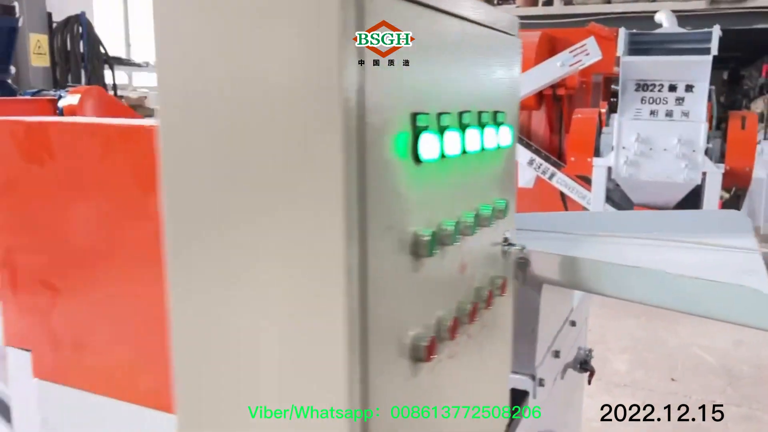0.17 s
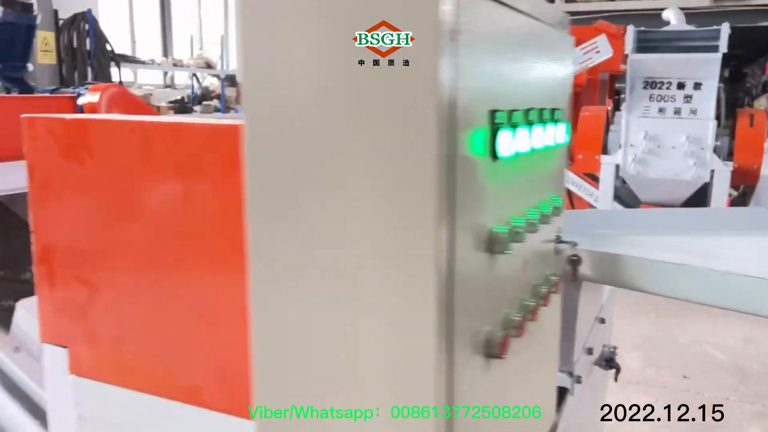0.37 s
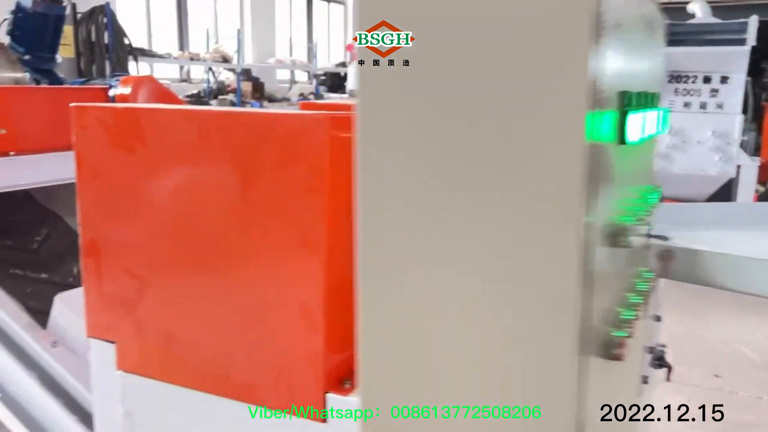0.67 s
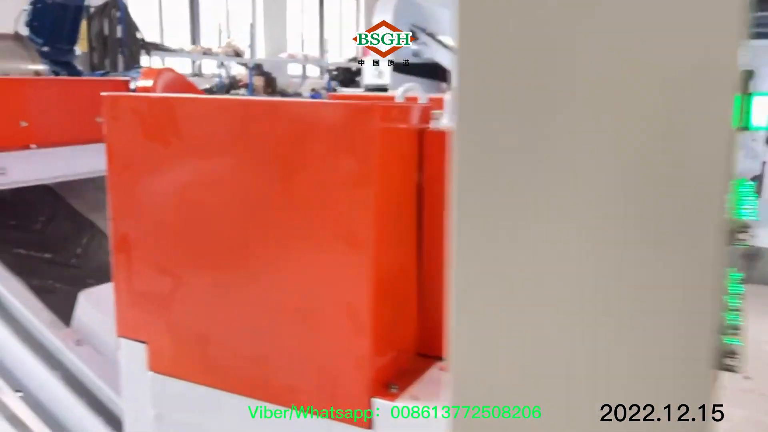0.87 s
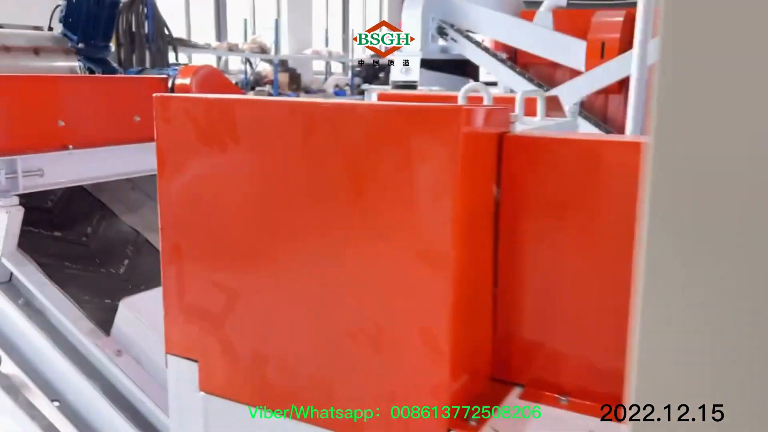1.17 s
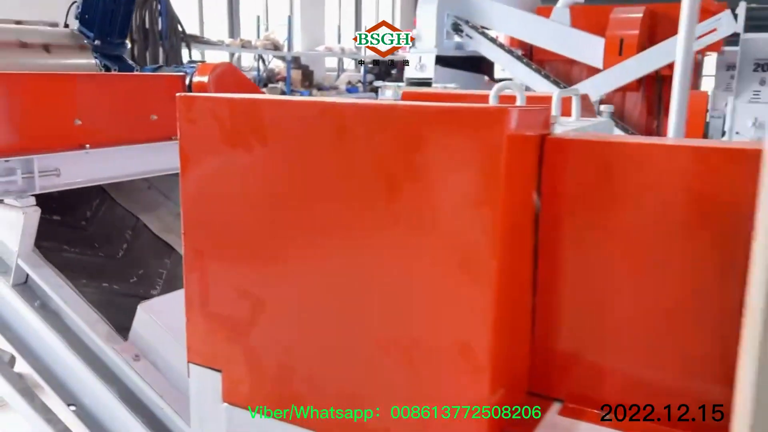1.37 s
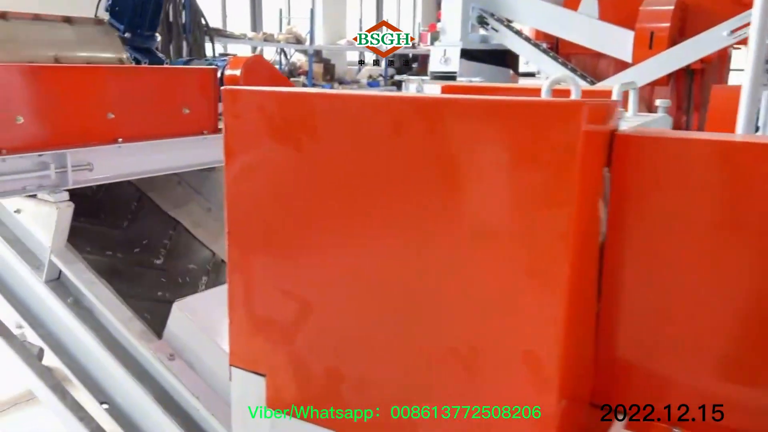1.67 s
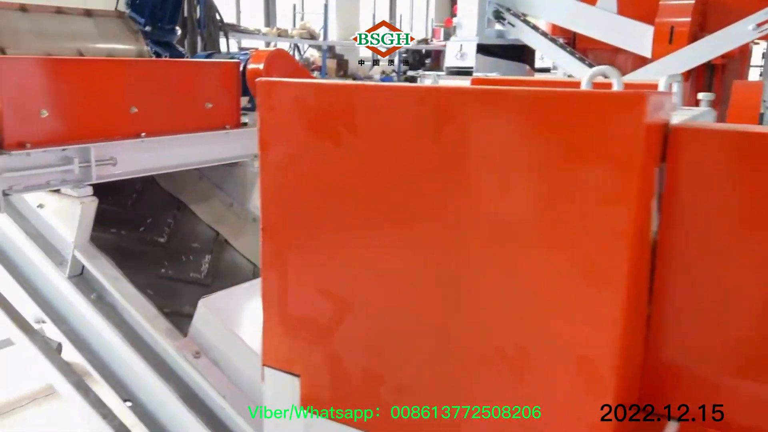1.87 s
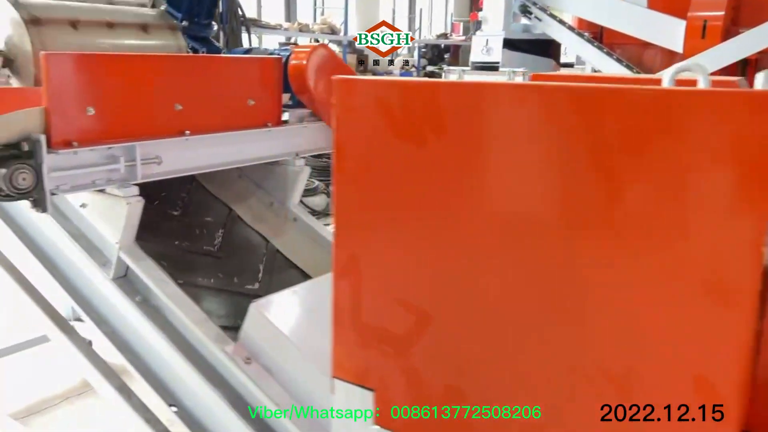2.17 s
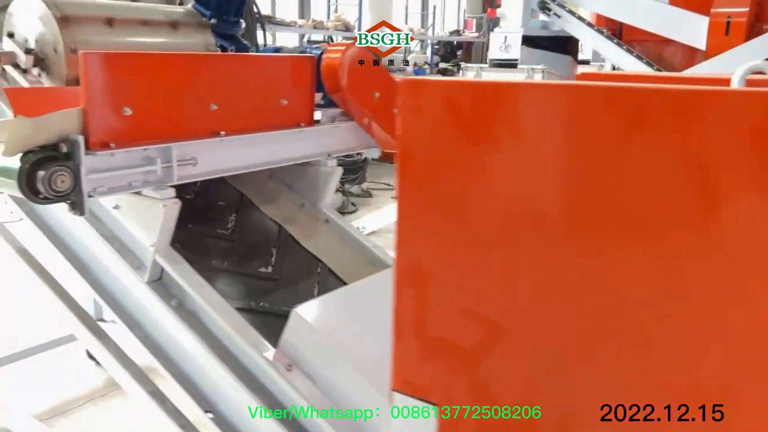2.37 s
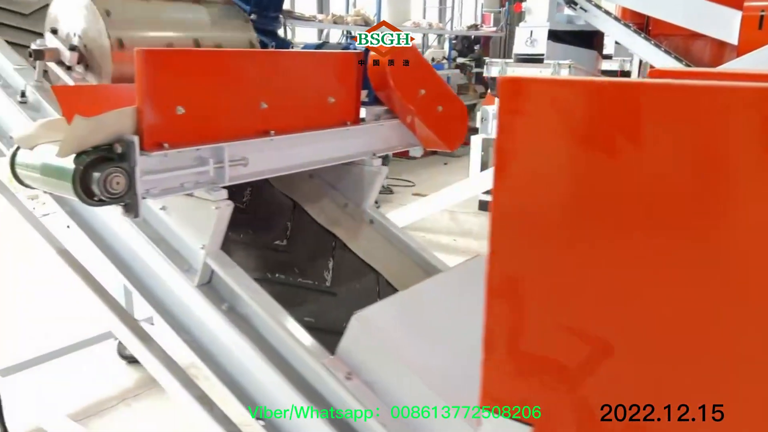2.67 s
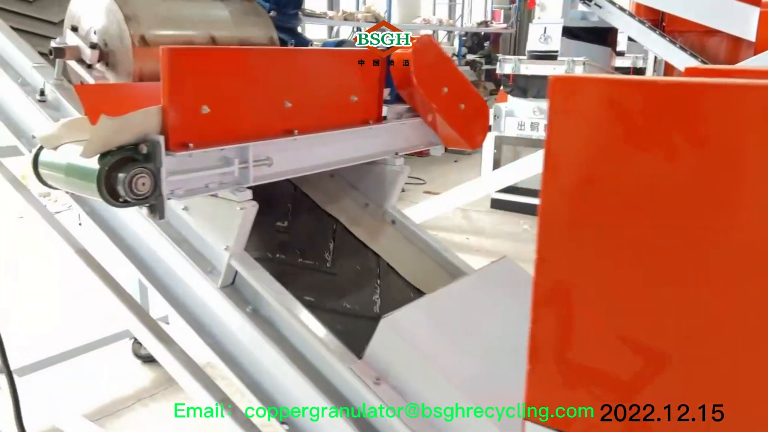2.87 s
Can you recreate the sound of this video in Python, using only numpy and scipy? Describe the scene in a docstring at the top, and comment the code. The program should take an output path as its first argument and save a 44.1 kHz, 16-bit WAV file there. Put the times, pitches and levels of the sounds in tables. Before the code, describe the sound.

Loud cable-chopping machinery drones in a workshop while chips hiss and rattle against steel.

```python
"""A granulator chops cable in a large workshop: its knives ring the steel housing, its rotor
shakes the frame and its panels whine. Chips hiss, a shaking table throws fine copper granules
and metal scrapes sing out, all over a bed of motor hum and heavy shaft rumble.
We hear it from a phone carried along the recycling line. Behind a steel cabinet the treble
falls away and single bursts of chips rattle out against sheet steel."""
import sys
import numpy as np
from scipy import signal
from scipy.fft import rfft, irfft
from scipy.io import wavfile

SR = 44100
rng = np.random.default_rng(int(sys.argv[2]) if len(sys.argv) > 2 else 0)


def bounce(signal):
    """Save signal as a 16-bit WAV file at the path given by the first command-line argument."""
    frames = np.transpose(np.atleast_2d(signal))
    limited = np.clip(frames, -1, 1)
    pcm = np.round(limited * 32767).astype(np.int16)
    wavfile.write(sys.argv[1], SR, pcm)


N = 132741

ROTOR_HZ, SHAFT_HZ, KNIVES = 10.676, 10.47, 3  # turns a second of rotor and heavy shaft; knife count
DRONE_REPEAT, CHOP_REPEAT = 0.42, 0.53  # share of the power that loops with each turn
SIDES = np.array([[1], [-1]])  # left, right

# Low bed of the workshop (frequency [Hz], density [dB per Hz])
FLOOR_SPECTRUM = [(20, -92), (35, -95), (52, -66), (84, -54.5), (106, -50.5), (130, -66), (200, -89)]
# Rumble of the heavy shaft (frequency [Hz], density [dB per Hz])
SHAFT_SPECTRUM = [(90, -86), (140, -56), (172, -45.5), (205, -45.5), (270, -47.5), (370, -51), (470, -76.5),
                  (900, -100)]
# Body of the granulator's frame (frequency [Hz], density [dB per Hz])
FRAME_SPECTRUM = [(250, -80), (370, -61), (450, -48.5), (560, -54.5), (660, -54.5), (790, -64),
                  (1100, -73.5), (3000, -105)]
# Clang of its steel housing (frequency [Hz], density [dB per Hz])
HOUSING_SPECTRUM = [(500, -86), (780, -68), (1020, -56.5), (1160, -59.5), (1370, -55.5), (1600, -63.5),
                    (1930, -60.5), (2150, -68), (2330, -65), (2550, -66.5), (2850, -70), (6000, -74.5),
                    (15000, -105)]
# Hiss of flying chips (frequency [Hz], density [dB per Hz])
CHIP_SPECTRUM = [(100, -93), (1000, -73.5), (2100, -69), (2700, -69), (3300, -70), (4100, -71.5),
                 (4900, -74.5), (6100, -71), (7000, -73.5), (8400, -73.5), (10500, -103), (15500, -90)]
# Sizzle of copper granules (frequency [Hz], density [dB per Hz])
GRANULE_SPECTRUM = [(4000, -100), (7500, -80), (9000, -72), (10800, -68.5), (12300, -72), (14200, -70.5),
                    (15500, -77)]
# Base colour of a burst of chips (frequency [Hz], density [dB per Hz])
RATTLE_SPECTRUM = [(80, -98), (300, -76), (900, -61), (1600, -62), (2200, -66), (3700, -65), (5200, -67),
                   (8400, -70.5), (11000, -70.5), (15500, -77)]
# Motor and panel hum (pitch [Hz], level at the control cabinet [dB], level at the far end [dB])
HUM_TONES = [(105.3, -48.5, -42.5), (179.6, -42, -29.5), (210, -43.5, -32.5), (235.8, -44, -38.5),
             (260.8, -36, -23.5), (323.8, -39.5, -27), (366, -38, -35.5), (467, -57, -34.5)]
# Panel whines (pitch [x rotor speed], off-beam gain [dB], on-beam gain [dB], time on beam [s])
WHINES = [(50, -40, -31.5, 2.1), (51, -46, -38, 2.0), (55, -39, -38, 1.5), (68, -51, -40.5, 1.7),
          (78, -56, -45, 1.2), (90, -49, -42, .7), (96, -51, -36, 1.4), (99, -50, -42, 1.2),
          (117, -50, -43, 1.2), (126, -50, -39.5, 1.55), (132, -47, -42, 1.0), (153, -60, -47, 1.4),
          (165, -60, -47, .3), (198, -53, -33.5, 1.56), (201, -56, -44, 1.7), (206, -51, -40, 1.6)]
# Resonances of the sheet steel that the chips hit (frequency [Hz], width [Hz], boost [dB])
STEEL_MODES = [(2130, 40, 9), (2205, 28, 13.5), (2552, 40, 8.5), (3235, 40, 8), (3478, 32, 10.5),
               (3768, 25, 6), (3892, 30, 7.5), (4377, 30, 5), (5276, 40, 4), (8530, 130, 6)]
# Bursts of chips (time [s], gain [dB], decay [s], tilt [dB per octave])
RATTLE_CUES = [(1.059, -7.5, 0.03, -6.5), (1.136, -6.5, 0.059, 8.5), (2.01, 1.5, 0.056, 4),
               (2.131, -5.5, 0.094, -3.5), (2.418, 0.5, 0.083, -.5), (2.491, -8.5, 0.021, 7),
               (2.608, 0.5, 0.037, 0), (2.637, -0.5, 0.098, 0), (2.744, -8, 0.033, 3), (2.979, -5, 0.16, 3)]
# Metal rubbing (peak time [s], half-length [s], pitch [Hz], width [Hz], level [dB])
SCRAPE_CUES = [(.35, 0.42, 6060, 500, -38.5), (2.39, 0.024, 8400, 300, -45),
               (2.757, 0.022, 7240, 200, -37.5), (2.757, 0.016, 8200, 300, -35)]
# The walk along the line (time [s], way to the far end [0-1])
WALK_PATH = [(0, 0), (1.0, 0.16), (1.7, 0.4), (2.3, 0.78), (2.65, 0.86), (3.0, 0.77)]
# Fader rides on the walk (time [s], shaft [dB], frame [dB], housing [dB], chips [dB], granules [dB])
FADERS = [(0, -2.5, -2, 1, 2.5, -5), (.5, -1, -1, -0.5, 1, -1.5), (1.05, -2.5, 2, -0.5, 1.5, -3),
          (1.5, -2.5, 1, 1, 1, 0.5), (1.8, -4, 1.5, -0.5, 2.5, -0.5), (2.1, 1.5, 1, -1, 3.5, 0),
          (2.25, 1, 1.5, -4, -9, -11), (2.45, 2.5, 0.5, -6.5, -17, -15), (2.7, -3, 0, -2.5, -8, -13),
          (3.0, -6, 1, -9, -16, -13.5)]
# How alike the two microphones sound (frequency [Hz], likeness [0-1])
MIC_LIKENESS = [(25, .94), (60, .99), (140, .98), (290, .945), (640, .77), (1400, .58), (3200, .35),
                (4600, .5), (5900, .45), (6700, .9), (8400, .92), (9400, .999), (10700, .999), (11600, .96),
                (15000, .96)]
# Phase between the microphones (frequency [Hz], left lead [rad])
MIC_PHASE = [(20, 0), (600, 0), (950, .5), (1800, -.4), (2800, .6), (4800, .3), (5900, -.7), (6700, 0),
             (7900, -.3), (8550, -1.1), (9000, -2.3), (9350, -3.1), (10750, -3.2), (11150, -4.1),
             (11800, -5.0), (12550, -6.2), (14100, -6.35), (14900, -6.9), (15400, -8.6)]
# Balance between the microphones (frequency [Hz], left minus right [dB])
MIC_BALANCE = [(60, -.4), (200, 0), (450, -1), (700, -1.4), (1200, 1.6), (2300, -.4), (4400, 1.6),
               (9000, 0)]


def amp(db):
    """Decibels to gain."""
    return 10 ** (np.asarray(db) / 20)


def unit(x):
    """Scale to an rms of one."""
    return x / np.sqrt(np.mean(x ** 2))


def clock():
    """Time of each sample in seconds."""
    return np.arange(N) / SR


def bins():
    """Frequency of each FFT bin in Hz."""
    return np.fft.rfftfreq(N, 1 / SR)


def automation(table):
    """One lane of straight ramps for each value column of a time table."""
    times, *columns = np.array(table, float).T
    return [np.interp(clock(), times, column) for column in columns]


def per_bin(table):
    """A frequency table read at every bin, on a log axis."""
    hz, value = np.array(table, float).T
    return np.interp(np.log(bins() + 1), np.log(hz), value)


def colour(x, spectrum):
    """EQ a white signal to a spectrum in dB per Hz."""
    return irfft(rfft(x) * amp(per_bin(spectrum)) * np.sqrt(SR / 2), N)


def drift(hz):
    """A smooth random modulator with an rms of one, rolling off around hz."""
    return unit(irfft(rfft(rng.standard_normal(N)) * np.exp(-(bins() / hz) ** 2), N))


def turns(hz, wobble=.0006):
    """Turns made by a shaft whose speed wanders by the share wobble."""
    return np.cumsum(hz * (1 + wobble * drift(3.1))) / SR


def clatter(turn, hz, repeat):
    """Two white clatters, of which a share loops with every turn."""
    size = int(SR / hz)
    one_turn = rng.standard_normal((2, SR))[:, :size]
    looped = one_turn[:, (turn % 1 * size).astype(int)]
    return np.sqrt(repeat) * looped + np.sqrt(1 - repeat) * rng.standard_normal((2, N))


def ticks(per_s, spread_db, hall_t60_s=.21, hall_db=-2):
    """Two streams of dense small impacts of uneven size, smeared by the hall."""
    hits = (rng.random((2, N)) < per_s / SR) * rng.choice([-1, 1], (2, N))
    hits = hits * amp(spread_db * np.minimum(rng.exponential(size=(2, N)), 7))
    tail = rng.standard_normal((2, N)) * np.exp(-np.log(1000) * clock() / hall_t60_s)
    reverb = unit(irfft(rfft(hits) * rfft(tail), N))
    return unit(unit(hits) + amp(hall_db) * reverb)


def tone(cycles, waver_db):
    """A wavering tone as it arrives by two paths."""
    return np.array([unit(amp(waver_db * drift(5.4)) * np.sin(2 * np.pi * (cycles + rng.random())))
                     for _ in range(2)])


def microphones(pair):
    """Spread a shared and a diffuse path over two microphones that differ in phase and level."""
    shared, diffuse = rfft(pair)
    likeness = per_bin(MIC_LIKENESS)
    stereo = np.sqrt((1 + likeness) / 2) * shared + SIDES * np.sqrt((1 - likeness) / 2) * diffuse
    balance = amp(SIDES * per_bin(MIC_BALANCE) / 2)
    phase = np.exp(.5j * SIDES * per_bin(MIC_PHASE))
    return irfft(stereo * balance * phase, N)


def shaft_rumble(spectrum):
    """The heavy shaft rumbles, partly repeating with each turn."""
    return colour(clatter(turns(SHAFT_HZ), SHAFT_HZ, DRONE_REPEAT), spectrum)


def motor_throb(way, pitch_hz=168, throb_hz=10.6, depth_db=6.3, peak_s=.089):
    """A motor drone pulses evenly, a little louder toward the far end."""
    swing_db = depth_db * np.cos(2 * np.pi * throb_hz * (clock() - peak_s))
    drone = tone(turns(pitch_hz, wobble=.012), waver_db=3)
    return unit(drone * amp(swing_db)) * amp(-30 + 1.5 * way)


def drives(shaft_db, far_pan_db=-1.2):
    """Shaft and motors drone; toward the far end the hum builds and the whole bed leans right."""
    way, = automation(WALK_PATH)
    rumble = shaft_rumble(SHAFT_SPECTRUM) * amp(shaft_db + .9 * drift(22))  # uneven throb
    hum = sum(amp(near + (far - near) * way) * tone(turns(hz, wobble=.003), waver_db=1)
              for hz, near, far in HUM_TONES)
    pan = amp(SIDES * far_pan_db * way / 2)
    return microphones(rumble + hum + motor_throb(way)) * pan


def scrapes():
    """Metal rubs and sings in narrow bands that swell and fade."""
    out = 0
    for peak_s, half_s, hz, width, db in SCRAPE_CUES:
        band = rfft(rng.standard_normal((2, N))) / (1 + (2 * (bins() - hz) / width) ** 2)
        swell = np.exp(-((clock() - peak_s) / half_s) ** 2)
        out = out + amp(db) * unit(irfft(band, N)) * swell
    return out


def shaking_table(stroke_hz=12.7, peak_s=.067, depth_db=1.6):
    """Fine copper granules land in a sizzle that surges once a stroke."""
    throw_db = depth_db * np.cos(2 * np.pi * stroke_hz * (clock() - peak_s)) + 1.1 * drift(22)
    return colour(ticks(per_s=10000, spread_db=3.5) * amp(throw_db), GRANULE_SPECTRUM)


def sheet_steel(impacts):
    """Sheet steel rings with each impact."""
    ring = 1 + sum((amp(db) - 1) / (1 + 2j * (bins() - hz) / width) for hz, width, db in STEEL_MODES)
    return irfft(rfft(impacts) * ring, N)


def rattles(attack_s=.0015, strike=.22, strike_s=.022, pivot_hz=5000):
    """Handfuls of chips hit and die away; the first to land strike hardest."""
    out = 0
    for start, db, decay_s, tilt in RATTLE_CUES:
        age = np.maximum(clock() - start, 0)
        attack = 1 - np.exp(-age / attack_s)
        decay = np.exp(-age / decay_s) + strike * np.exp(-age / strike_s)
        spectrum = [(hz, level + db + tilt * np.log2(hz / pivot_hz)) for hz, level in RATTLE_SPECTRUM]
        out = out + colour(ticks(per_s=11000, spread_db=2) * attack * decay, spectrum)
    return out


def chips(turn, pulse_db=1.0, peak_s=.021):
    """Chopped cable sprays around the chamber, a little harder at each knife."""
    flicker_db = .8 * drift(30)
    push_db = pulse_db * np.cos(2 * np.pi * KNIVES * (turn - peak_s * ROTOR_HZ)) + flicker_db
    return colour(ticks(per_s=9000, spread_db=3) * amp(push_db), CHIP_SPECTRUM)


def panels(turn, trim_db=1.9, beam_s=.65, shadow_s=2.22, edge_s=.04, shadow_db_per_khz=-5):
    """Panels beam their whines, each swelling as we pass, until the cabinet screens the highs."""
    hidden = (1 + np.tanh((clock() - shadow_s) / edge_s)) / 2
    judder = .0005 * drift(28)  # the rotor judders under load and roughens the high whines
    out = 0
    for order, off_db, on_db, passed_s in WHINES:
        on_beam = np.exp(-np.abs((clock() - passed_s) / beam_s) ** 3)
        khz = order * ROTOR_HZ / 1000
        shadow_db = hidden * shadow_db_per_khz * max(khz - .5, 0)
        whine = tone(order * (turn + judder), waver_db=2.8)
        out = out + amp(off_db + (on_db - off_db) * on_beam + shadow_db) * whine
    return out * amp(trim_db)


def knife_force(turn, first_s=.001, decay_s=.005, load_db=.5, load_peak_s=.034):
    """Each knife bites at two stationary blades, and the load swells once a turn."""
    passes = (turn - first_s * ROTOR_HZ) * KNIVES
    bite, second_bite = (np.exp(-((passes - offset) % 1) / (KNIVES * ROTOR_HZ * decay_s))
                         for offset in (0, .5))
    force = 1.2 + bite + .5 * second_bite  # the bites ride on a steady grind
    load = amp(load_db * np.cos(2 * np.pi * (turn - load_peak_s * ROTOR_HZ)))
    return unit(force * load)


def granulator(turn, frame_db, housing_db):
    """The rotor shakes the frame; the cuts ring the housing."""
    frame = colour(clatter(turn, ROTOR_HZ, DRONE_REPEAT), FRAME_SPECTRUM)
    housing = colour(clatter(turn, ROTOR_HZ, CHOP_REPEAT) * knife_force(turn), HOUSING_SPECTRUM)
    return frame * amp(frame_db) + housing * amp(housing_db)


def scene():
    """Mix the line in stereo, riding the faders along the walk."""
    shaft_db, frame_db, housing_db, chips_db, granules_db = automation(FADERS)
    turn = turns(ROTOR_HZ)
    floor = shaft_rumble(FLOOR_SPECTRUM)  # fills the whole workshop evenly
    machines = floor + granulator(turn, frame_db, housing_db) + panels(turn)
    ringing_chips = sheet_steel(chips(turn) * amp(chips_db) + rattles())
    material = ringing_chips + shaking_table() * amp(granules_db) + scrapes()
    return drives(shaft_db) + microphones(machines + material)


def record(dry):
    """The phone cuts the top with a steep low-pass at 15.6 kHz."""
    return signal.sosfilt(signal.ellip(10, .2, 80, 15600, fs=SR, output="sos"), dry)


dry = scene()
out = record(dry)
bounce(out)
```